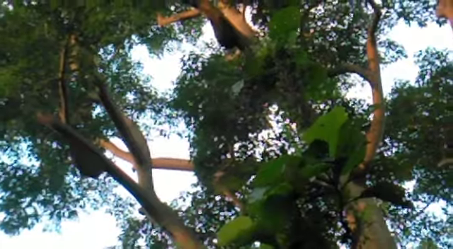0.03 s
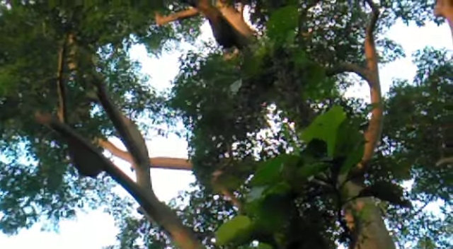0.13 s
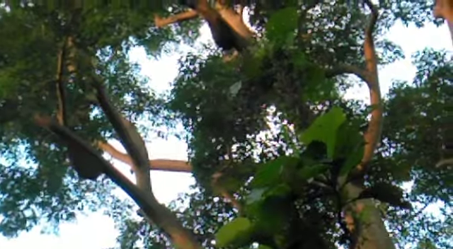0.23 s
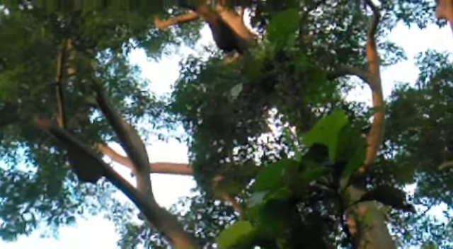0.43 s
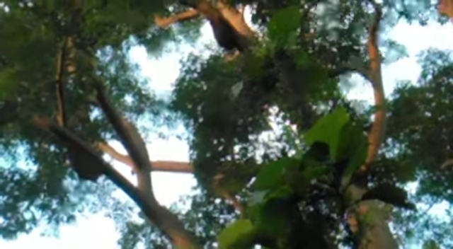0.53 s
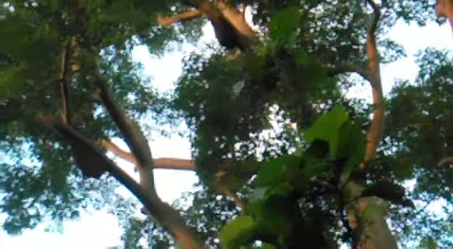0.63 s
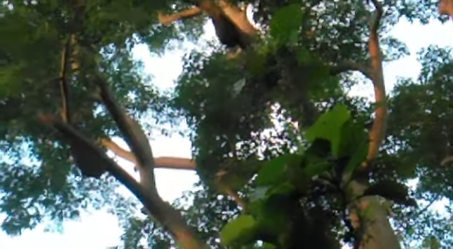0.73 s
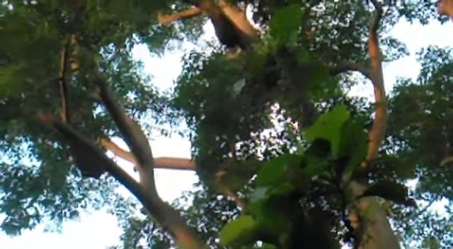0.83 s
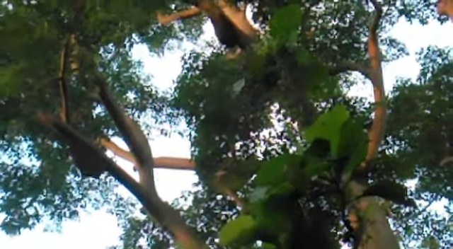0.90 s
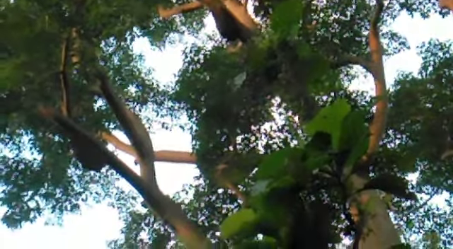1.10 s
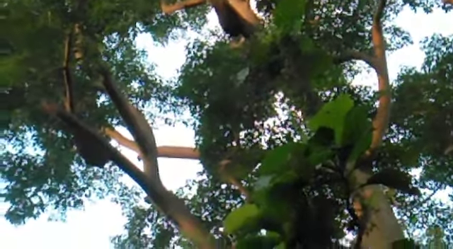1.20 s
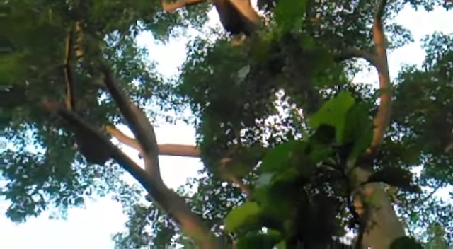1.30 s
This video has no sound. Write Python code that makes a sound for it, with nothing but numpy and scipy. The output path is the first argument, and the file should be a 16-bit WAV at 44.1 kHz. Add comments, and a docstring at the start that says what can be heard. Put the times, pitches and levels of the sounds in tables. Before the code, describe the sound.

Cicadas drone high in a forest, with short cricket chirps and one soft bump.

```python
"""From the start, insects drone high in a forest canopy over faint air and a low rumble.
One cicada's fast clicks ring as a clear whine that arches slowly in pitch; a far chorus hisses in bands.
A bush cricket scrapes out six rising chirps along the way, and a faint call fades far off.
At 0.2 s a hand nudges the camera once, giving a soft, very deep bump.
Around half a second, two more far calls swell and fade while the insects carry on."""
import sys
import numpy as np
from scipy import signal
from scipy.fft import rfft, irfft
from scipy.io import wavfile

SR = 44100
rng = np.random.default_rng(int(sys.argv[2]) if len(sys.argv) > 2 else 0)


def to_wav(s):
    """Save 16-bit WAV."""
    ch = np.atleast_2d(s).T  # columns
    pcm = np.round(np.clip(ch, -1, 1) * 32767)  # PCM
    wavfile.write(sys.argv[1], SR, pcm.astype(np.int16))


N = 59535

# tone colour of the forest air: frequency_hz, relative_db
AIR_SPECTRUM, AIR_DB = [(60, -22), (200, -16), (280, -19.5), (400, -16.5), (800, -20), (1600, -23),
                        (2500, -23), (4000, -25), (10000, -24), (16000, -26)], -71
# tone colour of the rumble: frequency_hz, relative_db
RUMBLE_SPECTRUM = [(20, -4.5), (50, -7.5), (80, -0.5), (110, -0.5), (140, -3.5), (180, -6), (240, -23.5),
                   (400, -34)]
# fader ride on the rumble: time_s, level_db
RUMBLE_FADER = [(0, -72.5), (.15, -74), (.45, -73), (.6, -71.5), (1.1, -70.5), (1.35, -73.5)]
# calls deep in the forest: start_s, length_s, pitch_hz, width_hz, level_db
DISTANT_CALLS = [(-.06, 0.22, 2320, 30, -82.5), (0.495, 0.38, 2358, 35, -81.5),
                 (0.563, 0.27, 2730, 109, -79.5)]
# the chorus's low, middle and high singers: frequency_hz, relative_db
LOW_BAND, LOW_DB = [(4000, -26), (4400, -5.5), (4700, -2.5), (4980, 0.5), (5150, -24)], -79
MID_BAND, MID_DB = [(5800, -28), (6300, -18), (6500, -8.5), (6700, -4), (7050, 0), (7250, -4),
                    (7520, -2), (7640, -11), (7950, -18), (8500, -47)], -65.5
HIGH_BAND, HIGH_DB = [(10500, -49.5), (12000, -24), (12900, -22.5), (13400, -8.5), (13850, -12),
                      (14200, -5), (14600, -8), (15200, -3.5), (15700, 3)], -57
# pulsing of single singers: rate_hz
MID_BUZZ_HZ, HIGH_BUZZ_HZ = [92.4, 135.8, 268], [20.45, 61.1, 195.5]
# bush cricket chirps: start_s, length_s, pitch_hz, level_db
CRICKET_CHIRPS = [(-.03, 0.084, 9170, -69.5), (0.072, 0.099, 9260, -69), (0.256, .14, 9270, -71.5),
                  (0.516, 0.11, 9350, -68.5), (0.798, .135, 9380, -70), (1.125, 0.19, 9390, -71)]
# the cicada's click rate: time_s, rate_hz
CICADA_RATE = [(0, 333.8), (.26, 332.2), (.33, 333.6), (.55, 334.7), (.72, 335.8), (1.0, 334.2),
               (1.18, 332.8), (1.35, 331.8)]
# fader ride on its shrill partial: time_s, level_db
SHRILL_FADER = [(0, -66), (.08, -55.5), (.23, -68.5), (.37, -71), (.44, -59.5), (.65, -73.5), (.9, -61.5),
                (1.04, -68.5), (1.18, -56), (1.24, -74), (1.35, -66)]
# fader ride on its low whistle: time_s, level_db
WHISTLE_FADER = [(0, -73), (.07, -79.5), (.12, -76), (.2, -76), (.26, -83.5), (.35, -74), (.56, -74),
                 (.63, -77), (.9, -77.5), (1.0, -76), (1.08, -81), (1.2, -76), (1.27, -89), (1.305, -74.5),
                 (1.35, -86)]
# its weak partials: rate_multiple, level_db
WEAK_PARTIALS = [(7, -90), (8, -96.5), (11, -93), (20, -75), (39, -74.5), (40.5, -83), (41, -82)]


def amp(db):
    """Decibels to gain."""
    return 10 ** (np.asarray(db) / 20)


def unit(x):
    """Scales to rms 1."""
    return x / np.sqrt(np.mean(abs(x) ** 2) + 1e-20)


def clock():
    """Time of every sample, in seconds."""
    return np.arange(N) / SR


def curve(points):
    """Joins (time_s, value) points by straight lines."""
    return np.interp(clock(), *np.transpose(points))


def noise(spectrum):
    """Noise of rms 1, coloured by a spectrum that dies away beyond its ends."""
    hz, db = np.transpose(spectrum)
    f = np.fft.rfftfreq(N, 1 / SR)
    eq = amp(np.interp(np.log(f + 1), np.log(hz), db, -90, -90))
    return unit(irfft(rfft(rng.standard_normal(N)) * eq, N))


def flutter(width_hz):
    """Complex random wavering of rms 1, about width_hz fast."""
    f = np.fft.fftfreq(N, 1 / SR)
    white = rng.standard_normal(N) + 1j * rng.standard_normal(N)
    return unit(np.fft.ifft(white / (1 + (f / width_hz) ** 2)))


def tone(hz, scatter, width_hz):
    """A tone of rms 1, part of it blurred, as when leaves scatter it."""
    carrier = np.exp(2j * np.pi * np.cumsum(hz * np.ones(N)) / SR)
    return unit((carrier * (1 + scatter * flutter(width_hz))).real)


def air():
    """The bed: faint forest air over an uneven low rumble."""
    return amp(AIR_DB) * noise(AIR_SPECTRUM) + amp(curve(RUMBLE_FADER)) * noise(RUMBLE_SPECTRUM)


def far_calls():
    """Blurred calls swell and fade deep in the forest."""
    out = np.zeros(N)
    for start, length, hz, width, db in DISTANT_CALLS:
        swell = np.sin(np.pi * np.clip((clock() - start) / length, 0, 1))
        out += amp(db) * swell * tone(hz, scatter=3.4, width_hz=width)
    return out


def buzz(rates, depth):
    """Tremolo of several singers, each pulsing unsteadily at its own rate."""
    return unit(1 + depth * sum(tone(hz, scatter=2.9, width_hz=1.8) for hz in rates))


def chorus():
    """Many far singers merge into three hissing bands, the upper two buzzing, and one narrow trill."""
    low = amp(LOW_DB) * noise(LOW_BAND)
    middle = amp(MID_DB) * noise(MID_BAND) * buzz(MID_BUZZ_HZ, depth=0.038)
    high = amp(HIGH_DB) * noise(HIGH_BAND) * buzz(HIGH_BUZZ_HZ, depth=0.055)
    trill = amp(-73.5) * tone(hz=7747, scatter=3.3, width_hz=43)
    return low + middle + high + trill


def camera_bump(start_s=0.203, rise_s=0.016, fall_s=0.12, recover_hz=0.1):
    """A light knock, one slow push on the microphone, and a short shudder of the camera in the hand."""
    t = clock() - start_s
    age = np.maximum(t, 0)
    push = (1 - np.exp(-age / rise_s)) * np.exp(-(age / fall_s) ** 2)
    push = signal.lfilter(*signal.butter(1, recover_hz, "high", fs=SR), push)
    knock_age = np.maximum(t + 0.0033, 0) / 0.0032  # peaks just as the push begins
    knock = knock_age * np.exp(1 - knock_age) * tone(hz=425.7, scatter=0.95, width_hz=120)
    swell = np.exp(-((t - 0.074) / 0.039) ** 2)  # peaks 74 ms into the push
    shudder = swell * tone(hz=103.84, scatter=1.14, width_hz=34)
    return amp(-30) * push + amp(-69) * knock + amp(-62) * shudder


def canopy(x, t60_s, wet_db):
    """Adds the diffuse reverb of trunks and leaves."""
    tail = unit(rng.standard_normal(N) * amp(-60 * clock() / t60_s)) / np.sqrt(N)
    return x + amp(wet_db) * signal.fftconvolve(x, tail)[:N]


def bush_cricket(attack_s=0.047, release_s=0.025, ring_s=0.071, glide_hz_per_s=400):
    """Short rising chirps, roughened by the teeth of the file, each trailing off in a purer note."""
    out = np.zeros(N)
    for start, length, hz, db in CRICKET_CHIRPS:
        t = clock() - start
        rise = np.clip(t / attack_s, 0, 1)
        fall = np.clip((length - t) / release_s, 0, 1)
        teeth = unit(1 + 0.45 * tone(hz=193.6, scatter=0.8, width_hz=46))
        pitch = hz + glide_hz_per_s * (np.minimum(t, length) - length / 2)
        ring = amp(-1) * (1 - fall) * np.exp(-np.maximum(t - length, 0) / ring_s)
        out += amp(db) * (rise * fall * teeth + ring) * tone(pitch, scatter=0.97, width_hz=50)
    return canopy(out, t60_s=0.29, wet_db=-7.5)


def cicada():
    """The lead whine: a fast, even click train of which the body rings only a few multiples."""
    rate = curve(CICADA_RATE)
    shrill = amp(curve(SHRILL_FADER)) * tone(40 * rate, scatter=0.4, width_hz=10)
    whistle = amp(curve(WHISTLE_FADER)) * tone(10 * rate, scatter=0.26, width_hz=20)
    weak = sum(amp(db) * tone(k * rate, scatter=2.2, width_hz=6.4) for k, db in WEAK_PARTIALS)
    return shrill + whistle + weak


def scene():
    """The mono mix of insects, far calls, forest air and the bump."""
    return (cicada() + bush_cricket() + chorus() + far_calls() + air() + camera_bump())[None]


def record(dry):
    """A steep high cut takes off the very top."""
    high_cut_hz = 15790
    taps = signal.firwin(1023, high_cut_hz, window=("kaiser", 8), fs=SR)
    return signal.oaconvolve(dry, taps[None], "same")


dry = scene()
out = record(dry)
to_wav(out)
```